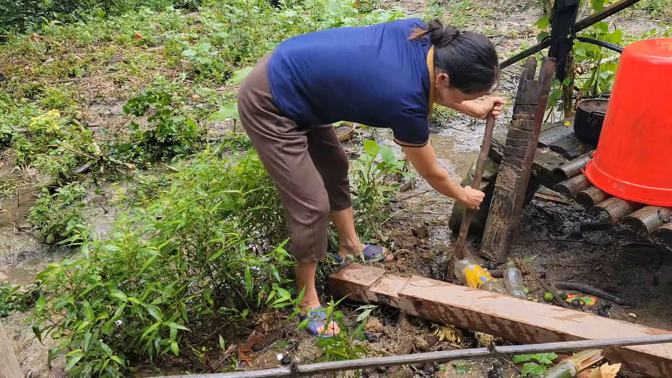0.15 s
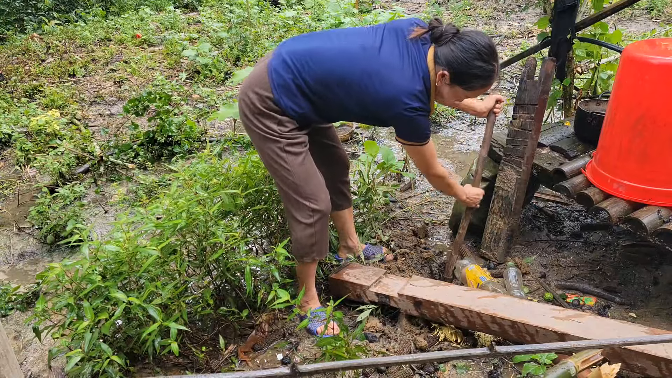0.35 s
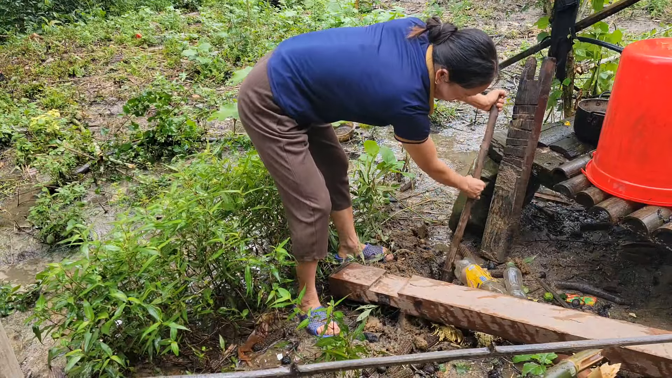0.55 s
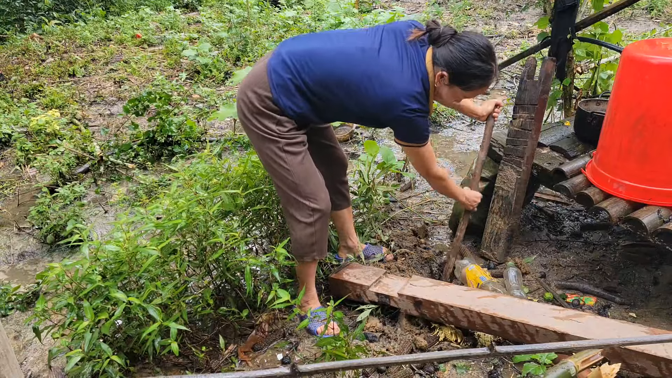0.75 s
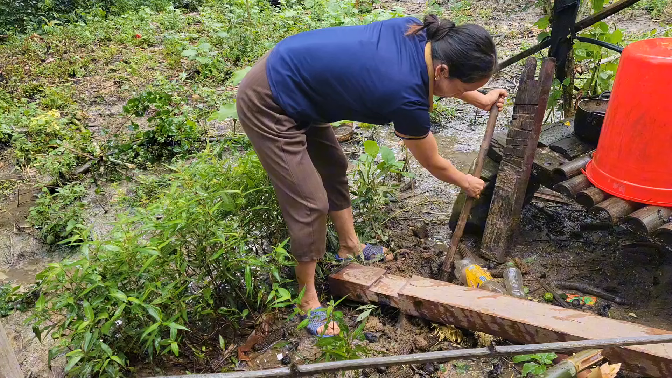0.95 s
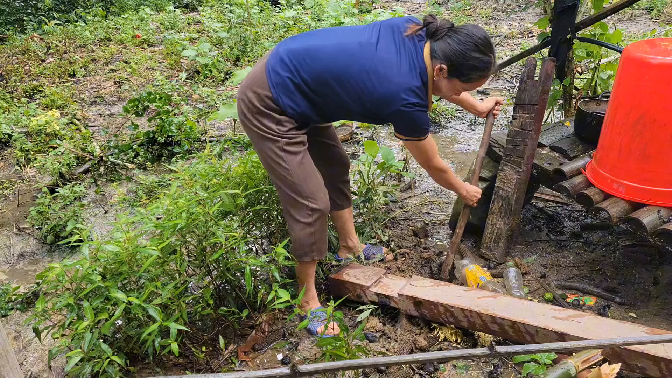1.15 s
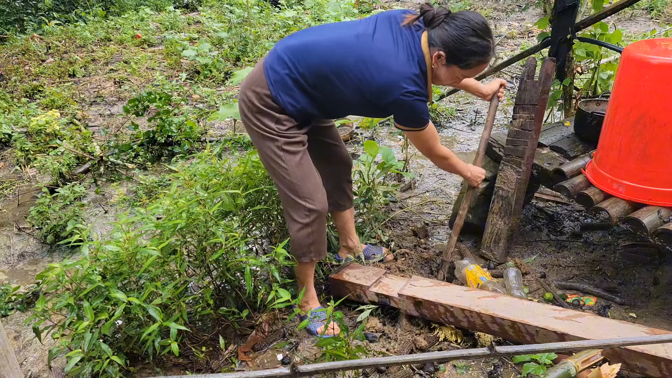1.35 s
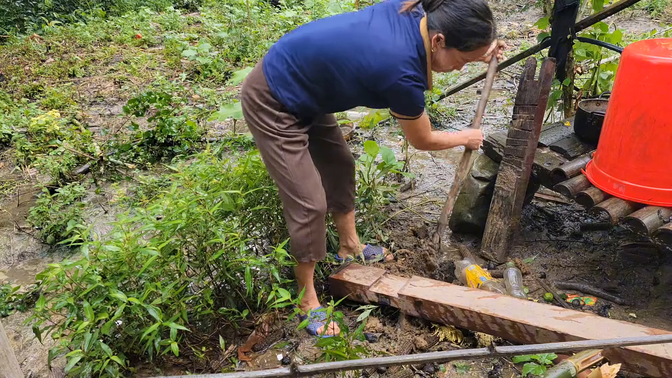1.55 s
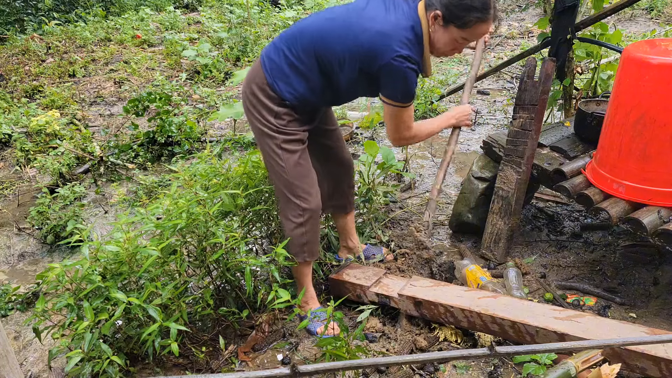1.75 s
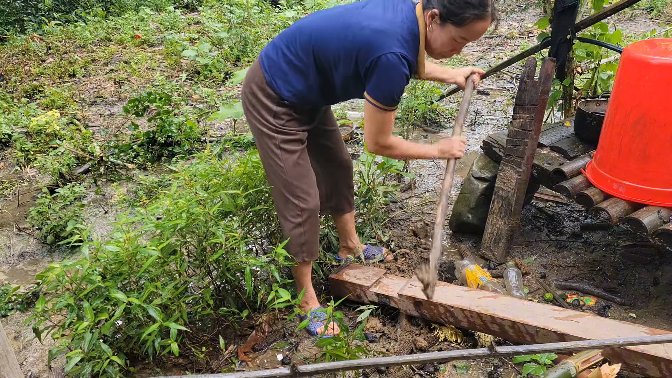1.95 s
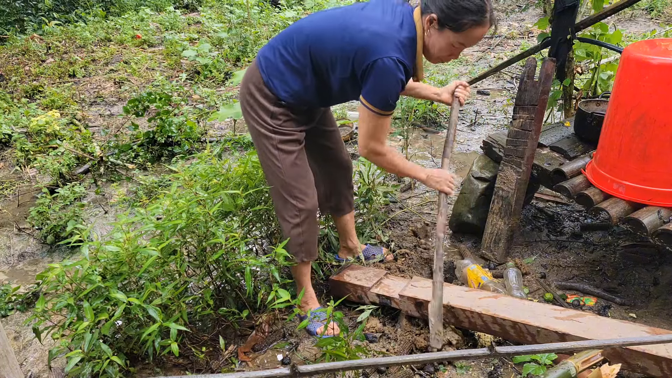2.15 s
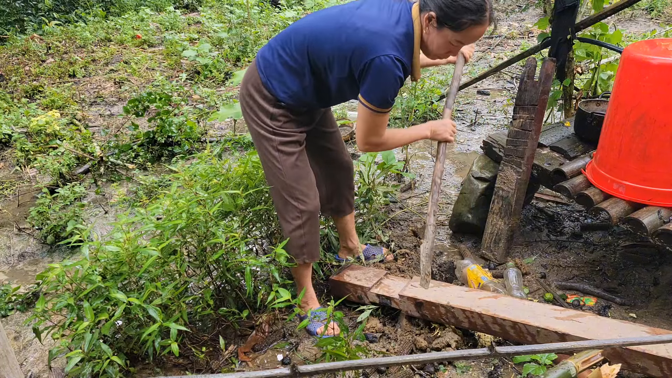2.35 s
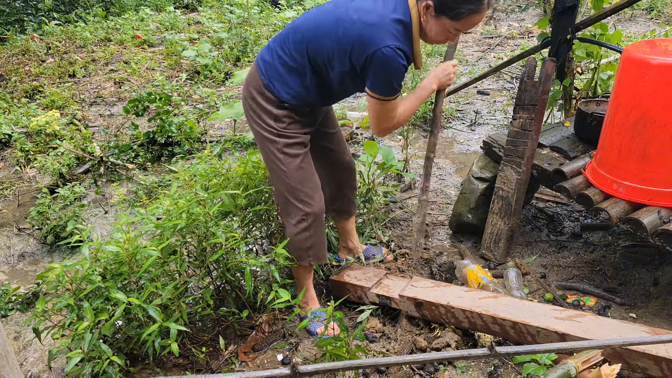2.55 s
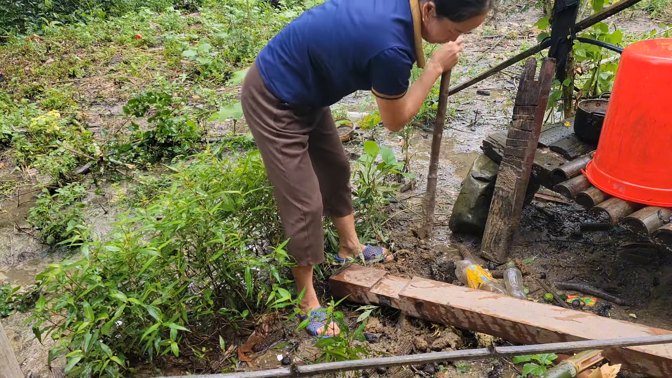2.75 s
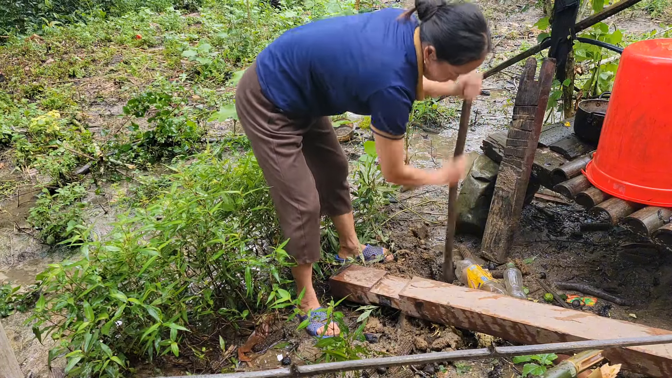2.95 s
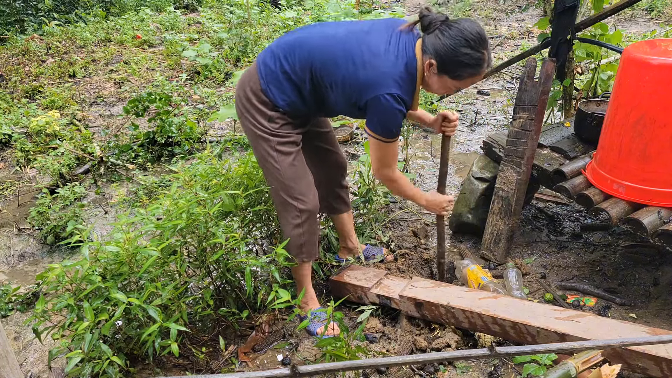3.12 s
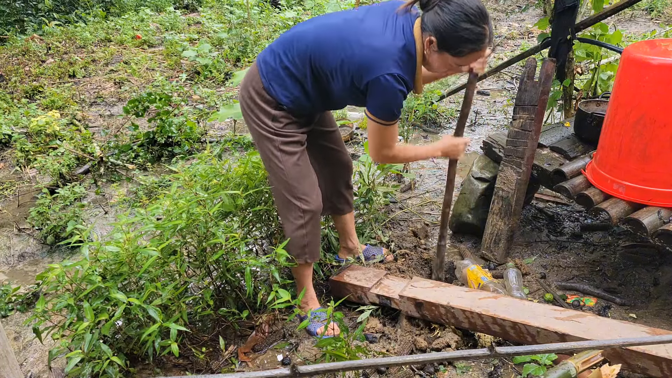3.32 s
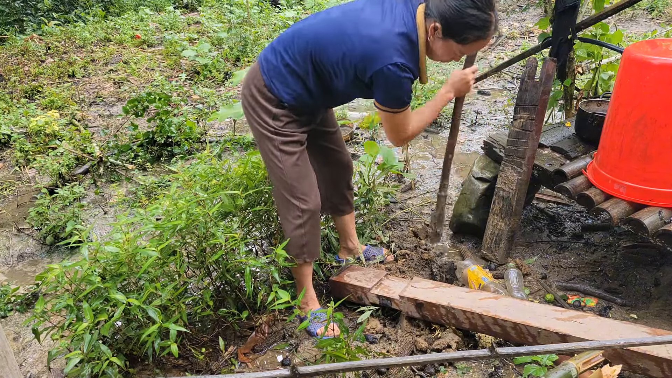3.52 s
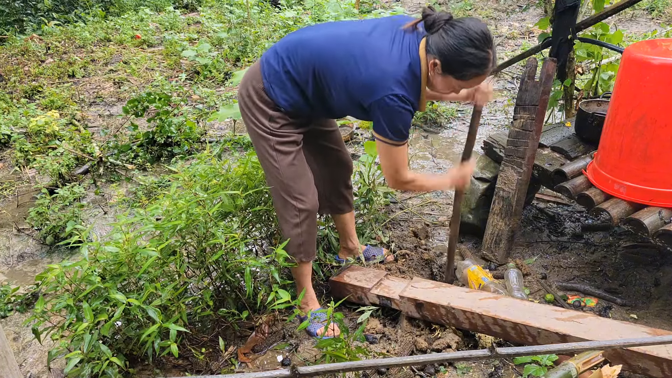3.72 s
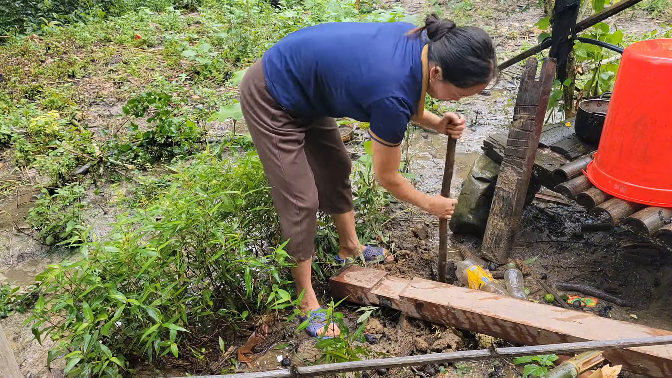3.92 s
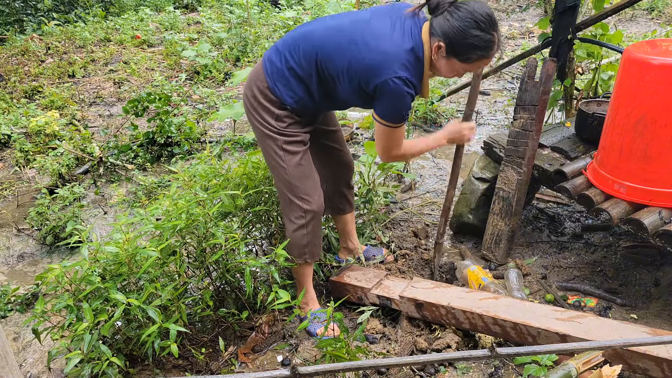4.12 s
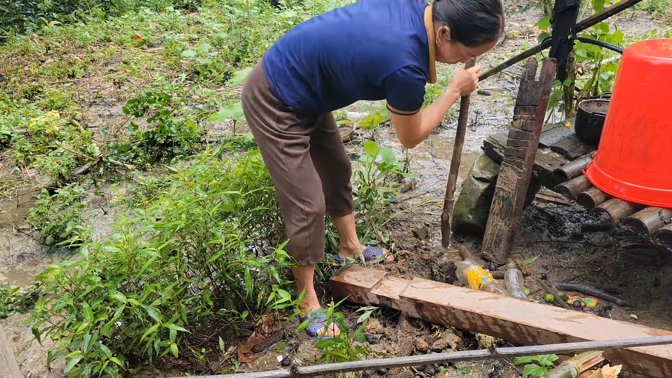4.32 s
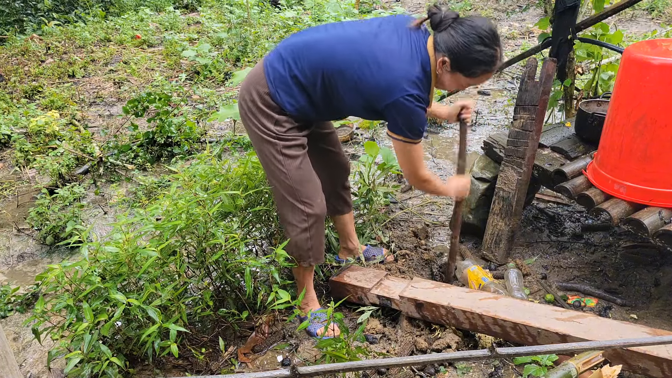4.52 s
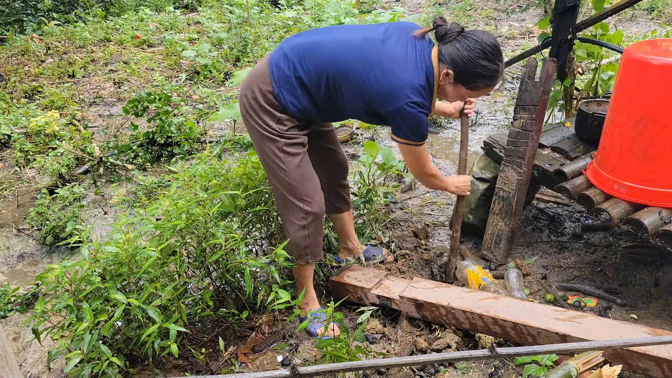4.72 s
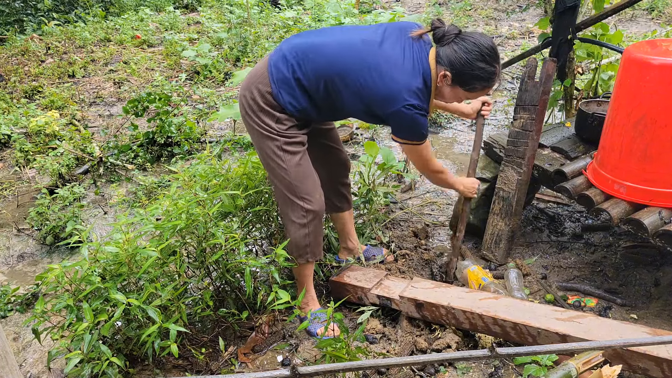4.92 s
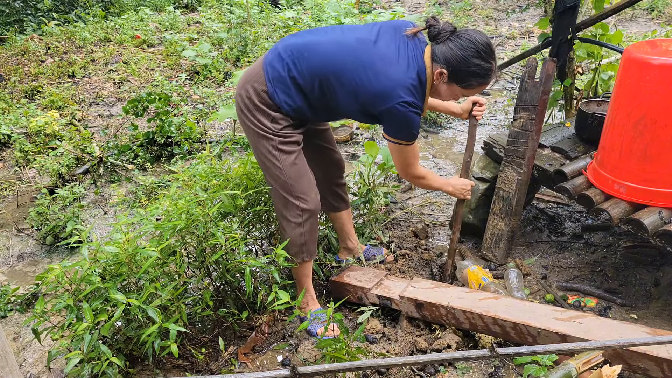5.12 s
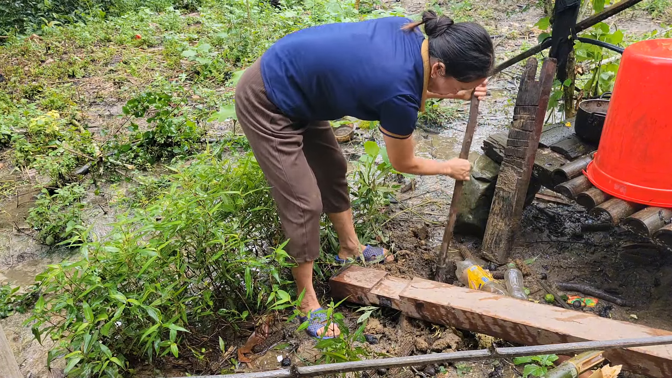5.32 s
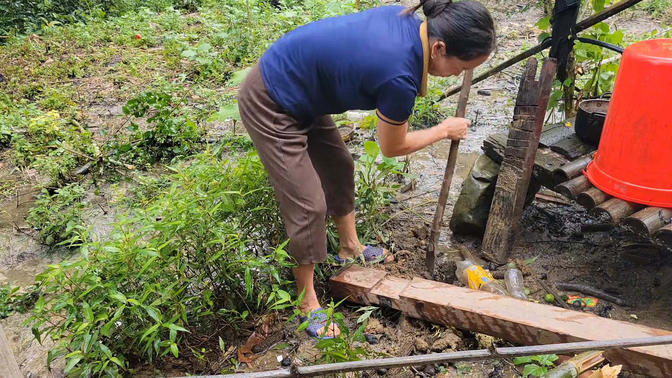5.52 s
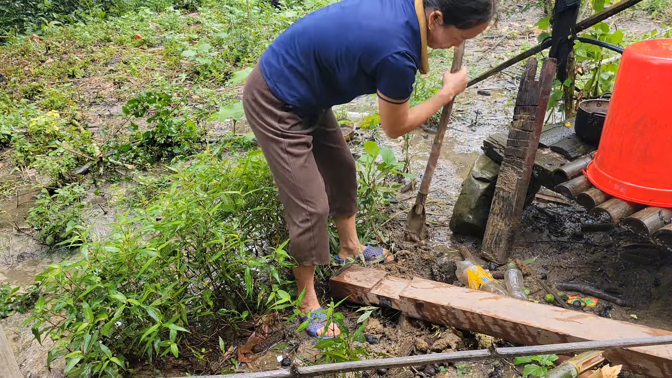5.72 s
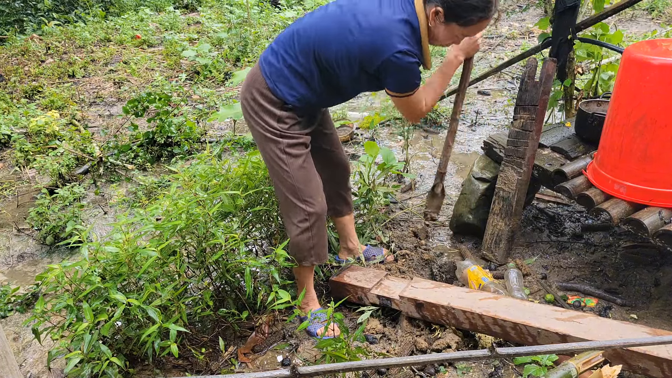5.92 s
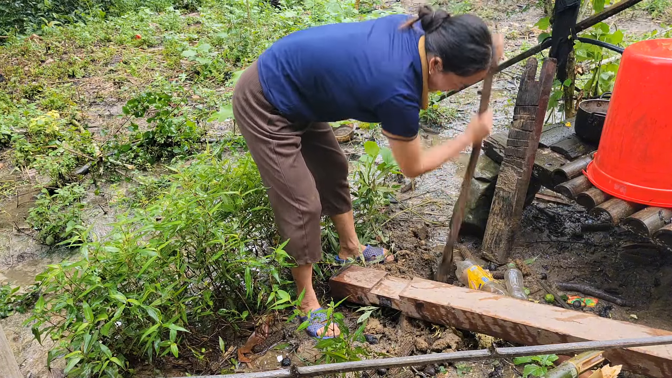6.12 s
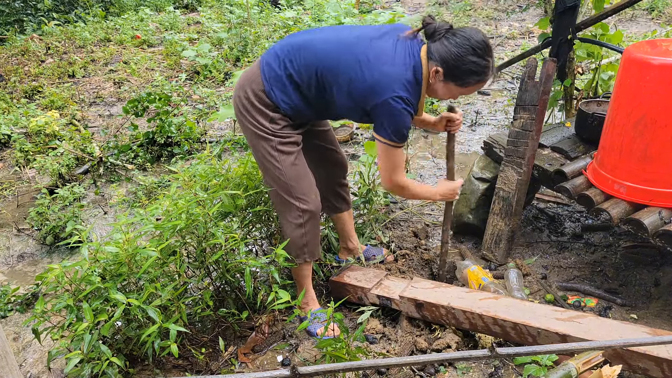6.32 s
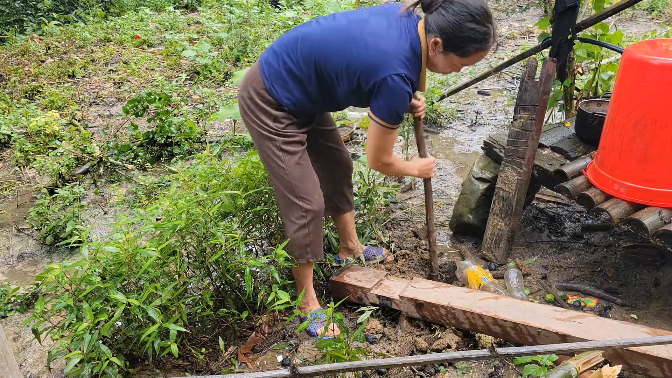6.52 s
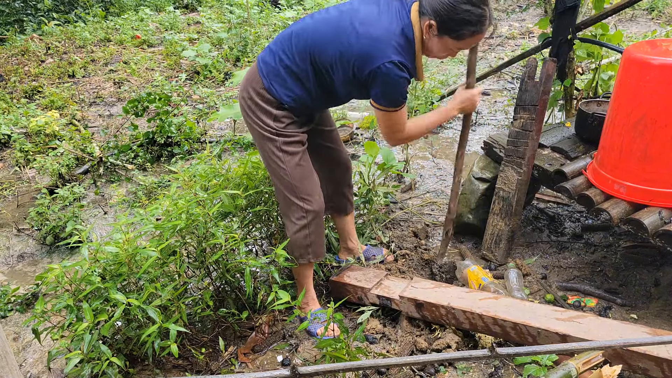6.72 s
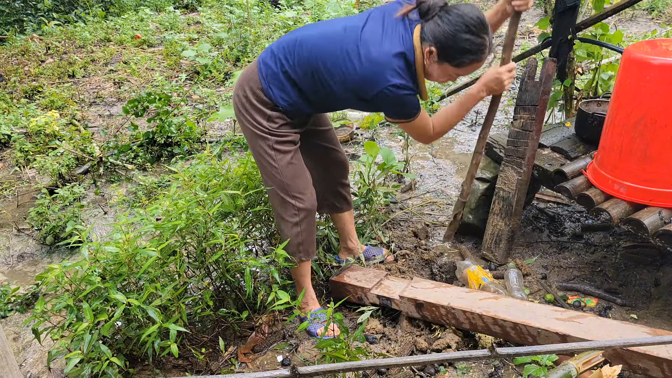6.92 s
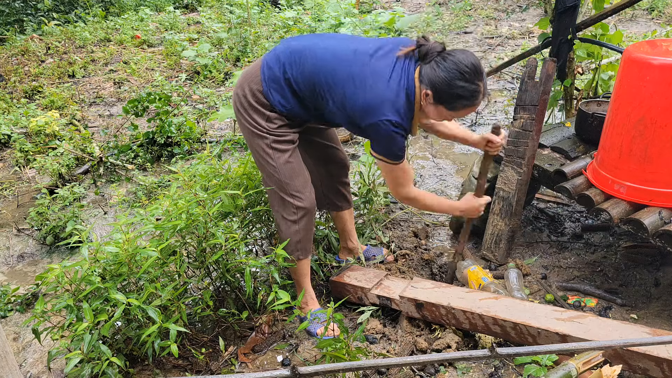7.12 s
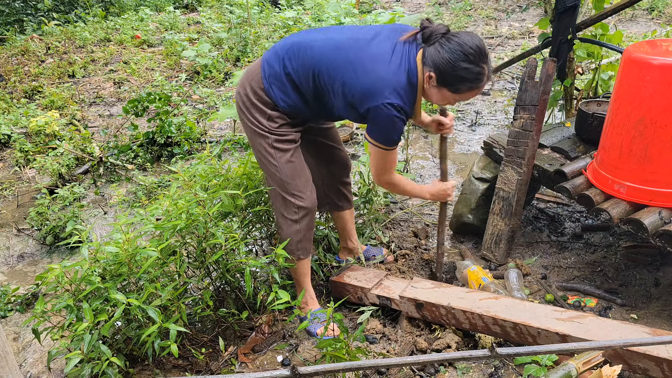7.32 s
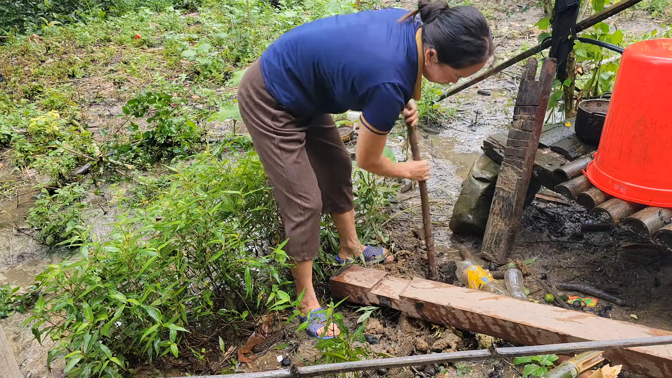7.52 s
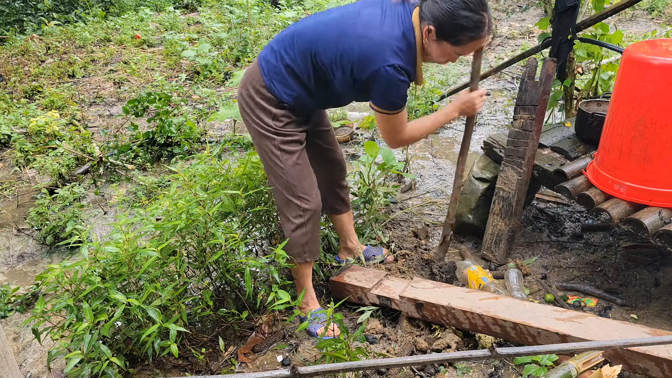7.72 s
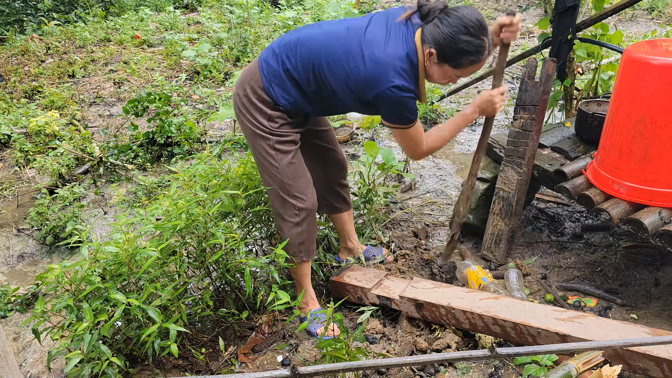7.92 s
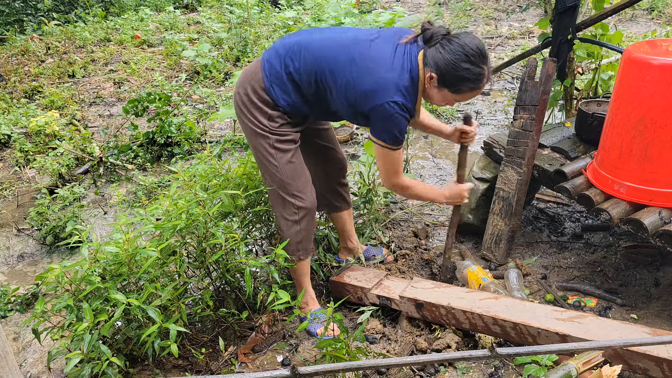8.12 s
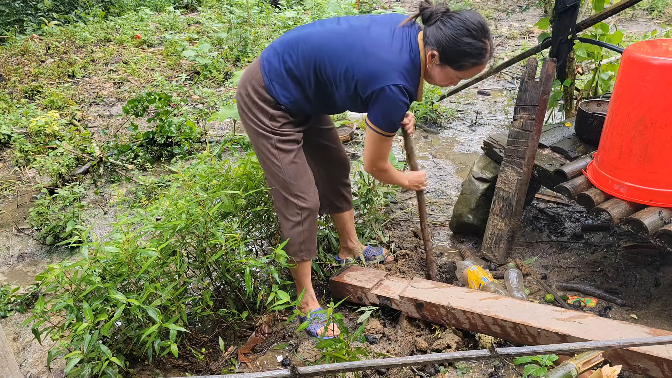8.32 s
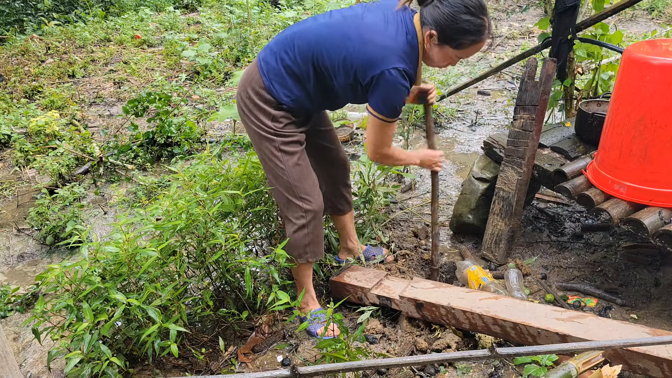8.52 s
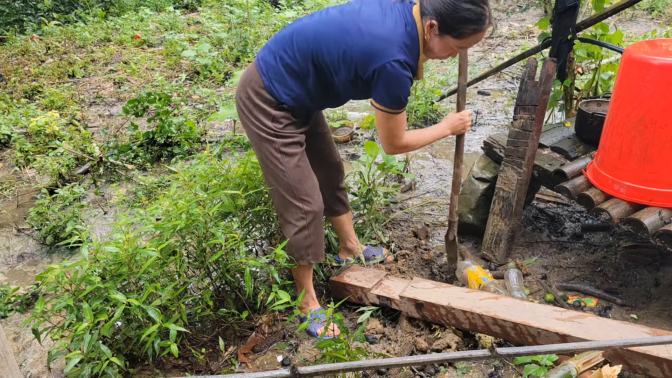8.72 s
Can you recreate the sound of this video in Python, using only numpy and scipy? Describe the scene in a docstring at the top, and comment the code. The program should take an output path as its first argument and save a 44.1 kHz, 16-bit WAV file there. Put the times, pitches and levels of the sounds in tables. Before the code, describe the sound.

A close stereo outdoor scene, with the work slightly right of centre. From 0 to 1.5 s a steel bar levers an old post in stony soil: faint scrapes, low groans, small stone ticks and trickling grit. At about 2.0 s the bar lands on a loose plank with a hollow, briefly ringing knock and a lighter skid. A tiny click and squeak come near 2.6 s. Then six far louder blows hit wet ground at about 3.0, 3.7, 4.5, 6.15, 7.1 and 8.0 s, each a gritty bite and grind stopping in a hard stony crunch, short low thud and woody knock. Between them are soft scrapes, ticks, pattering crumbs and very faint metallic squeaks around 3.6 and 5.3 s. Brief shed reflections and a faint yard echo follow. Throughout, quiet distant rumble, leaf hiss and a thin high insect chorus swell and fade.

```python
"""Faint scrapes and groans come first, over singing insects: a long bar levers an old wooden post in stony soil.
The bar is set down on a plank, which rings from damped modes, then driven into the wet ground in six blows.
Each blow bites, grinds through grit and stops with a thud: shaped grains of noise plus damped low tones.
Stones tick as resonant noise, wet metal squeaks as gliding notes, and a shed and yard answer in diffuse noise.
Behind it lie distant rumble, leaf hiss and the insects: filtered noise that swells and fades."""
import sys
import numpy as np
from scipy import signal
from scipy.fft import rfft, irfft, next_fast_len
from scipy.io import wavfile
from scipy.ndimage import map_coordinates

SR = 44100
rng = np.random.default_rng(int(sys.argv[2]) if len(sys.argv) > 2 else 0)


def transcribe(u):
    """Save the signal u as a 16-bit wav file named by the first command-line argument.

    u: samples, shape (n,) or (channels, n), limited to [-1, 1]; the rate is SR.
    q: integer samples, one column per channel.
    """
    v = np.clip(np.atleast_2d(u).T, -1, 1)
    q = np.round(v * 32767).astype(np.int16)
    wavfile.write(sys.argv[1], SR, q)


N = 390726

# Blows of the bar; levels are relative within each layer.
# Columns: contact t/s, full stop t/s, bite level/dB, grind level/dB, crunch level/dB,
# treble lift level/dB, ground thud level/dB, thud f/Hz, post knock level/dB, knock f/Hz
BLOWS = [(2.966, 2.979, -10, -19, -13, -7.5, -17.5, 151, -7, 325),
         (3.728, 3.7462, -34.5, -17, -19, -5.5, -13, 176, -5, 323),
         (4.504, 4.518, -27, -20.5, -14, -5, -11, 152, -18, 403),
         (6.152, 6.165, -22.5, -20.5, -15.5, 0, -10.5, 160, -10.5, 342),
         (7.059, 7.073, -6, -18, -10.5, -4, -20, 147, -11, 306),
         (8.009, 8.026, -10.5, -21, -14.5, -1, -11.5, 200, -7.5, 329)]
# Prying strokes: t/s, length t/s, relative level/dB, load (0 = drawn loose, 1 = full weight on the post)
PRYING_STROKES = [(0.016, .032, -51, 1), (0.177, 0.042, -51, 0.71), (0.334, 0.012, -40.5, 0.71),
                  (0.44, 0.15, -60.5, 0.6), (0.68, 0.016, -44.5, 0.57), (0.697, .017, -39.5, 0.66),
                  (0.825, 0.077, -52, 0.55), (1.036, 0.022, -47.5, 0.79), (1.06, 0.027, -46, .6),
                  (1.147, 0.068, -53.5, 0.55), (1.247, 0.053, -52, 0.58), (1.43, 0.098, -60.5, 0.49),
                  (3.183, .023, -44, 0.49), (3.908, 0.034, -46, 0.47), (4.467, 0.041, -54.5, 0.35),
                  (4.672, 0.055, -51, 0.85), (4.705, 0.02, -41, .55), (4.842, 0.024, -47.5, 0.66),
                  (5.013, 0.059, -54.5, 0.71), (5.087, 0.02, -51.5, 0.54), (5.18, 0.027, -46.5, 0.38),
                  (5.234, 0.016, -47.5, 0.44), (5.273, 0.015, -42, .25), (5.648, 0.093, -59.5, 0.58),
                  (6.455, 0.025, -50.5, 0.55), (6.55, 0.028, -52.5, 0), (7.273, 0.041, -49.5, 0.61),
                  (7.306, 0.042, -45.5, 0.76), (7.37, 0.052, -51.5, 0.36), (7.44, 0.0089, -57.5, 0.62),
                  (7.521, 0.017, -49.5, 0.35), (8.189, 0.059, -50, 0.65), (8.223, 0.059, -45.5, .55),
                  (8.317, .015, -44, 0.38), (8.448, 0.066, -50.5, 0.1), (8.501, 0.036, -49, 0)]
# Bar landing on the plank, then slipping: t/s, ring level/dB, hardness/(dB per octave), relative grit level/dB
PLANK_CONTACTS = [(2.036, -24.5, -1, -34.5), (2.0634, -35, 6, -34)]
# Stones that knock, grate and snap: t/s, peak level/dB, f/Hz, rattle t60/s
STONE_TICKS = [(0.021, -40, 1580, 0.02), (0.191, -38, 1310, 0.037), (0.340, -32.5, 1500, .025),
               (0.699, -30, 2670, 0.028), (1.256, -38, 3170, .02), (1.362, -47, 1320, 0.024),
               (2.615, -39.5, 2380, 0.022), (2.689, -47, 1470, 0.052), (3.525, -45.5, 2700, 0.19),
               (3.749, -15, 1570, 0.016), (3.904, -41.5, 1520, 0.21), (4.518, -13, 2690, 0.044),
               (4.677, -38.5, 974, 0.054), (4.71, -30.5, 940, 0.049), (4.844, -37, 970, .03),
               (5.017, -43, 990, .03), (5.275, -38.5, 1370, 0.029), (6.166, -16, 1252, 0.02),
               (7.285, -35.5, 1125, 0.25), (7.443, -33.5, 3800, 0.018), (8.228, -39.5, 1110, 0.32),
               (8.317, -36.5, 1480, 0.043), (8.453, -38, 2700, 0.027)]
# Squeaks of the wet bar sliding out: t/s, length t/s, start f/Hz, end f/Hz, relative level/dB
SQUEAKS = [(2.619, 0.015, 2440, 2330, -50.5), (3.603, 0.12, 2050, 2130, -63),
           (5.255, .2, 2115, 1770, -60.5), (5.427, .08, 2250, 2075, -60)]

# Damped modes of the loose plank and of the wet ground: f/Hz, relative level/dB, t60/s
PLANK_MODES = [(168.3, -7.5, 0.38), (230, -24, 0.11), (268.3, 3, 0.24), (329, -0.5, 0.044),
               (393, -6, 0.082), (480, -8, 0.081), (751, -9.5, 0.15), (1320, -17, 0.077),
               (2420, -29, 0.045)]
GROUND_MODES = [(66.4, -8.5, 0.057), (96.8, -9.5, 0.11), (133, -17, 0.34), (176, -18.5, 0.23),
                (256, -25.5, 0.1504)]
# Resonances of the steel bar: f/Hz, width f/Hz, relative level/dB
BAR_MODES = [(906, 20, -8), (1350, 19, -7), (1605, 55, -5), (1852, 90, -2), (2100, 65.3, 2),
             (2505, 130, -9.5), (3144, 42, -6.5), (3350, 190, -3), (4170, 390, 4), (4940, 47.2, -9.5)]

# Tone colours, all f/Hz, relative level/dB: the tip biting, stones crunching, grit shearing
BITE_SPECTRUM = [(30, -38.5), (120, -12), (230, -0.5), (380, 0.5), (580, -27), (1000, -1.5), (2000, -2),
                 (3300, 0), (5000, -3.5), (7000, -8), (10000, -16), (16000, -19.5)]
CRUNCH_SPECTRUM = [(30, -36), (200, -8.5), (400, -4), (600, -8), (950, 4), (1250, -3), (1900, 2.5),
                   (3300, -0.5), (6000, -10.5), (9000, -21), (16000, -41.5)]
GRIT_SPECTRUM = [(100, -30), (600, -8.5), (1500, -1), (2800, 6), (4500, -1.5), (7000, -11), (10000, -24.5),
                 (16000, -26.5)]
# Same columns: the post groaning, steel rubbing on stone, wet mud crackling
GROAN_SPECTRUM = [(50, -34), (130, -9), (220, -5.5), (340, 3), (430, -18.5), (560, -19), (1500, -44),
                  (16000, -79)]
RUB_SPECTRUM = [(100, -38), (550, -6.5), (780, 2.5), (1050, 1.5), (1450, 1.5), (2000, -19), (4000, -20),
                (16000, -67.5)]
CRACKLE_SPECTRUM = [(500, -47.5), (4000, 10), (7000, 0.5), (10000, -5), (16000, -7.5)]
# Same columns: distant rumble and leaf hiss
AIR_SPECTRUM = [(20, -5), (53, -6.5), (85, 0), (117, -7), (161, -6), (242, -15.5), (335, -8.5),
                (550, -15.5), (1300, -14), (1840, -17), (4370, -19), (5730, -25.5), (7510, -26),
                (16000, -41)]

# Stereo likeness of sound from all around: f/Hz, left-right correlation
STEREO_LIKENESS = [(60, 0.98), (130, 0.91), (290, 0.71), (640, 0.095), (1410, -0.26), (3100, 0.046)]
# Echo decay of the close shed and of the open yard: f/Hz, t60/s
SHED_DECAY = [(130, 0.44), (500, 0.14), (2500, 0.14), (7000, 0.14), (15000, 0.18)]
YARD_DECAY = [(130, 0.91), (500, 1), (3000, 0.67), (7000, 0.68), (15000, 0.249)]

# Insect song bands: centre f/Hz, width f/Hz, relative level/dB
INSECT_BANDS = [(7440, 290, 1), (10350, 350, -15.5)]
# Course of the insect chorus: t/s, relative level/dB
CHORUS_LEVEL = [(0.0, -73), (0.32, -70), (3.68, -74), (4.0, -72), (4.19, -77.5), (5.21, -72), (5.97, -76),
                (6.41, -71.5), (6.69, -75), (7.08, -76), (7.23, -72), (8.02, -70), (8.17, -67.5),
                (8.86, -71.5)]

# Parts of a prying stroke against its grit: level/dB with no load, level/dB at full load
GROAN_DB, RUB_DB, CRACKLE_DB = (-23.5, 10), (-16.5, 3.5), (-1.5, -17)
STROKE_PEAK, JERK_DB = 0.4, 3  # share of the length spent swelling; depth of the jerks in dB
# Soil running back: level/dB against the stroke, rise t/s, t60/s
TRICKLE_DB, TRICKLE_RISE_S, TRICKLE_T60 = -16, 0.036, 0.84
# Stone resonance: Q at the reference f/Hz, and how steeply Q falls with pitch
STONE_Q, STONE_HZ, Q_FALL = 14.5, 990, 1.34
# Stray stones, one per stroke: median level/dB, median f/Hz, t60/s, longest wait t/s
STRAY_DB, STRAY_HZ, STRAY_T60, STRAY_WITHIN_S = -50, 2010, 0.017, 0.14
TOP_HZ = 16200  # the microphone's band limit


def amp(db):
    """Decibels to gain."""
    return 10 ** (np.asarray(db) / 20)


def unit(x):
    """Bring x to rms 1."""
    return x / np.sqrt(np.mean(x ** 2) + 1e-20)


def along(points, hz):
    """Read a (f/Hz, value) curve on a log frequency axis."""
    f, v = np.transpose(points)
    return np.interp(np.log(hz + 1), np.log(f + 1), v)


def clock():
    """Time in seconds within one event, half a second long."""
    return np.arange(SR // 2) / SR


def add(track, s, x):
    """Mix x into the track at s seconds, cut at the track's end."""
    part = track[..., max(round(s * SR), 0):][..., :x.shape[-1]]
    part += x[..., :part.shape[-1]]


def filtered(x, response):
    """Shape x by a response given as a function of frequency."""
    size = next_fast_len(x.shape[-1] + 8192)  # padding gives the filter's tail room
    spectrum = rfft(x, size) * response(np.fft.rfftfreq(size, 1 / SR))
    return irfft(spectrum, size)[..., :x.shape[-1]]


def wobble(rate, size=N):
    """A smooth random curve with rate knots a second."""
    knots = rng.standard_normal(int(size * rate / SR) + 4)
    return map_coordinates(knots, [np.arange(size) * rate / SR])


def burst(t, rise, t60):
    """A quick rise and an exponential fall, silent before t = 0."""
    t = np.maximum(t, 0)
    return (1 - np.exp(-t / rise)) * amp(-60 * t / t60)


def swell(t, peak):
    """A rounded push that tops out at 1 after peak seconds."""
    u = np.maximum(t, 0) / peak
    return (u * np.exp(1 - u)) ** 2


def ring(t, modes, rise, scatter_db):
    """Damped modes, each struck at a slightly different strength every time."""
    out = np.zeros(len(t))
    for hz, db, t60 in modes:
        strength = amp(db + scatter_db * rng.standard_normal())
        out += strength * burst(t, rise, t60) * np.sin(2 * np.pi * hz * t)
    return out


def grains(envelope, spectrum, rate, spread_db):
    """Tiny fractures of uneven size, rate a second on average; the whole takes the envelope's rms."""
    n = len(envelope)
    happens = rng.random(n) < rate / SR
    snaps = happens * rng.choice([-1, 1], n) * amp(spread_db * rng.standard_normal(n))
    x = filtered(snaps * envelope, lambda hz: amp(along(spectrum, hz)))
    return unit(x) * np.sqrt(np.mean(envelope ** 2))


def diffuse(size):
    """Noise from all around: the channels nearly agree in the bass and are mostly unrelated in the treble."""
    def mid_side_gains(hz):
        turn = np.arccos(np.clip(along(STEREO_LIKENESS, hz), -1, 1)) / 2
        return np.array([np.cos(turn), np.sin(turn)])

    mid, side = filtered(rng.standard_normal((2, size)), mid_side_gains)
    return np.array([mid + side, mid - side])


def blows():
    """The tip bites, grinds through grit, then stops dead: stones crunch, ground and post thud."""
    out, t = np.zeros(N), clock()
    for (s, stop, bite_db, grind_db, crunch_db, lift_db,
         thud_db, thud_hz, knock_db, knock_hz) in BLOWS:
        late = t - (stop - s)  # time since the full stop
        sinking = np.minimum(t / 0.0039, 1) * amp(-60 * np.maximum(late, 0) / 0.0083)
        bite = amp(bite_db + 2.0) * burst(t, 0.00042, 0.014)
        entry = np.hypot(bite, amp(grind_db - 5.0) * sinking)
        # a hard crack at the stop, then a short collapse of grit
        crack = amp(4.5) * burst(late, 0.00028, 0.017)
        collapse = np.hypot(crack, amp(-8) * burst(late, 0.0013, 0.047))
        stones = grains(entry, BITE_SPECTRUM, rate=8000, spread_db=4.0)
        stones += grains(amp(crunch_db + 2.5) * collapse, CRUNCH_SPECTRUM, rate=11000, spread_db=9.5)
        treble_lift = [(3000, 0.0028), (12000, lift_db)]
        stones = filtered(stones, lambda hz: amp(along(treble_lift, hz)))
        # wet earth and the post embedded in it swing only a few cycles
        thud = swell(late, 0.0058) * np.sin(2 * np.pi * thud_hz * late)
        thud += ring(late, GROUND_MODES, rise=0.0046, scatter_db=1.0)
        knock = swell(late, 0.0035) * -np.sin(2 * np.pi * knock_hz * late)
        # loosened crumbs patter down afterwards
        patter = grains(amp(-49.0) * burst(late, 0.012, 0.26), GRIT_SPECTRUM, rate=1800, spread_db=11)
        add(out, s, stones + amp(thud_db) * thud + amp(knock_db) * knock + patter)
    return out


def prying():
    """Under load steel rubs on stone and the post groans; lightly loaded strokes crackle with wet mud."""
    out, t = np.zeros(N), clock()
    for s, length, db, load in PRYING_STROKES:
        u = t / (STROKE_PEAK * length)
        # the stroke swells and fades in small jerks
        stroke = amp(db) * u * np.exp(1 - u) * amp(JERK_DB * wobble(110, size=len(t)))

        def part(span_db):
            unloaded, loaded = span_db
            return stroke * amp(unloaded + load * (loaded - unloaded))

        trickle = amp(db + TRICKLE_DB) * burst(t, TRICKLE_RISE_S, TRICKLE_T60)
        sound = grains(stroke, GRIT_SPECTRUM, rate=1100, spread_db=5.5)
        sound += grains(part(GROAN_DB), GROAN_SPECTRUM, rate=500, spread_db=5.5)
        sound += grains(part(RUB_DB), RUB_SPECTRUM, rate=220, spread_db=1.5)
        sound += grains(part(CRACKLE_DB), CRACKLE_SPECTRUM, rate=500, spread_db=2.0)
        sound += grains(trickle, GRIT_SPECTRUM, rate=1800, spread_db=10)
        add(out, s - 0.002, sound)
    return out


def bar(x):
    """Whatever the tip touches rings the bar's modes, damped by hands and mud."""
    body = [(500, -0.5), (1200, -5.0), (4000, -2.5), (6000, 1)]  # f/Hz, level/dB

    def response(f):
        modes = sum(amp(db) * 1j * f * w / (c * c - f * f + 1j * f * w) for c, w, db in BAR_MODES)
        return amp(along(body, f)) + 0.36 * modes

    return filtered(x, response)


def plank():
    """The gritty tip drops on a loose plank, then skids with a harder click: damped modes plus grit."""
    out, t = np.zeros(N), clock()
    for s, ring_db, hardness, grit_db in PLANK_CONTACTS:
        # a harder contact tilts the modes towards the treble
        modes = [(hz, db + hardness * np.log2(hz / 256), t60) for hz, db, t60 in PLANK_MODES]
        wood = ring(t, modes, rise=0.001, scatter_db=1)
        grit = grains(amp(grit_db) * burst(t, 0.00046, 0.074), BITE_SPECTRUM, rate=2200, spread_db=12.0)
        add(out, s, amp(ring_db) * wood + grit)
    return out


def stray_stones():
    """One small stone drops a random wait after the start of each prying stroke."""
    strays = []
    for s, *_ in PRYING_STROKES:
        when = s + STRAY_WITHIN_S * rng.random()
        level_db = STRAY_DB + rng.normal(0, 4.4)
        hz = STRAY_HZ * np.exp(rng.normal(0, 0.335))
        strays.append((when, level_db, hz, STRAY_T60))
    return strays


def crumbs():
    """Stones tick against each other and the bar: a brief noise rattle through one resonance."""
    out, t = np.zeros(N), clock()
    for s, db, hz, t60 in STONE_TICKS + stray_stones():
        # smaller, higher stones ring less sharply
        q = max(STONE_Q * (STONE_HZ / hz) ** Q_FALL, 1)
        rattle = burst(t, 0.00033, t60) * rng.standard_normal(len(t))
        tick = filtered(rattle, lambda f: 1j * f * hz / q / (hz * hz - f * f + 1j * f * hz / q) * q)\
            if q == 0 else filtered(rattle, lambda f: 1j * f * hz / (hz * hz - f * f + 1j * f * hz / q))
        add(out, s, amp(db) * tick / np.abs(tick).max())
    return out


def squeaks():
    """Wet metal sticks and slips: a thin, broken, gliding note with weak overtones."""
    out, t = np.zeros(N), clock()
    for s, length, start_hz, end_hz, db in SQUEAKS:
        u = np.minimum(t / length, 1)
        glide = start_hz + (end_hz - start_hz) * u
        pitch = glide * (1 + 0.012 * wobble(500, size=len(t)))
        phase = 2 * np.pi * np.cumsum(pitch) / SR
        grip = np.sin(np.pi * u) * amp(db - 2 + 4 * wobble(90, size=len(t)))
        note = np.sin(phase) + 0.35 * np.sin(2 * phase) + 0.15 * np.sin(3 * phase)
        add(out, s, grip * note)
    return out


def early(x, t60):
    """First reflections from the ground and the post: short noise tails, a fresh one every 0.75 s."""
    out, size = np.zeros((2, N)), SR * 3 // 4
    for start in range(0, N, size):
        tail = diffuse(SR // 8) * burst(np.arange(SR // 8) / SR, 0.0011, t60)
        tail /= np.linalg.norm(tail[0])
        add(out, start / SR, signal.fftconvolve(x[None, start:start + size], tail, axes=1))
    return out


def afterglow(x, decay, delay):
    """Echoes from countless leaves and boards: each band stores its energy and lets it out as noise."""
    hz, t, z = signal.stft(x, SR, nperseg=512)
    keep = amp(-60 * t[1] / along(decay, hz)) ** 2  # energy kept from frame to frame
    energy = np.abs(z) ** 2
    power = np.array([signal.lfilter([1 - k], [1, -k], band) for k, band in zip(keep, energy)])
    noise = signal.stft(diffuse(N), nperseg=512)[2]
    glow = signal.istft(noise / np.std(noise) * np.sqrt(power), nperseg=512)[1]
    out = np.zeros((2, N))
    add(out, delay, glow)
    return out


def outdoors():
    """Distant rumble and leaf hiss, with a thin insect chorus that swells and fades."""
    air = unit(filtered(diffuse(N), lambda hz: amp(along(AIR_SPECTRUM, hz))))
    air *= amp(-56.5 + 0.21 * wobble(1.3) + 0.592 * wobble(4.89))
    chorus_db = np.interp(np.arange(N) / SR, *np.transpose(CHORUS_LEVEL))
    for centre, width, db in INSECT_BANDS:
        song = unit(filtered(diffuse(N), lambda hz: 1 / (1 + ((hz - centre) / width) ** 4)))
        air += song * amp(chorus_db + db + 0.6 + 1.2 * wobble(3.7) + 1.1 * wobble(13))
    return air


def scene():
    """The work lies a little to the right: it reaches that channel first and louder."""
    work = bar(blows() + prying()) + plank() + crumbs() + squeaks()
    lag = 0.00011  # s between the channels
    direct = filtered(work, lambda hz: np.exp(np.outer([-1, 1], 1j * np.pi * hz * lag)))
    direct = direct * amp([[-1.2], [1.4]])  # left, right in dB
    # small things nearby scatter the treble and let the bass pass: f/Hz, level/dB
    scatter = [(60, -30.0), (150, -12.5), (350, -12.5), (900, 0.5), (3000, 1.0), (12000, 5.0)]
    scattered = filtered(work, lambda hz: amp(along(scatter, hz)))
    near = amp(-4) * early(scattered, t60=0.032)
    shed = amp(-5.5) * afterglow(scattered, SHED_DECAY, delay=0.011)
    yard = amp(-23.5) * afterglow(scattered, YARD_DECAY, delay=0.05)
    return direct + near + shed + yard + outdoors()


def record(dry):
    """The microphone sheds the deepest bass, rounds the highest peaks and keeps nothing above its band limit."""
    x = signal.sosfilt(signal.butter(2, 60, "highpass", fs=SR, output="sos"), dry)
    x = x / (1 + np.abs(x / 0.95) ** 6) ** (1 / 6)
    return filtered(x, lambda hz: hz < TOP_HZ)


dry = scene()
out = record(dry)
transcribe(out)
```